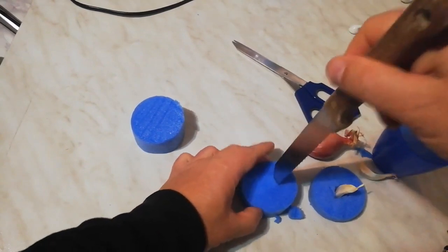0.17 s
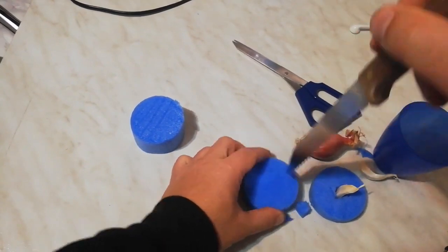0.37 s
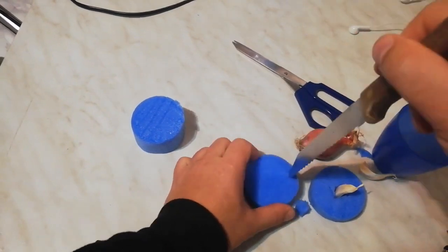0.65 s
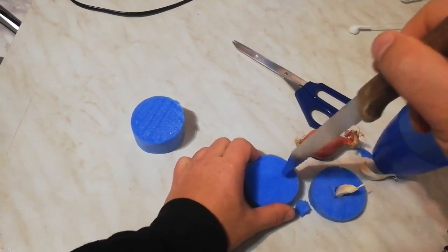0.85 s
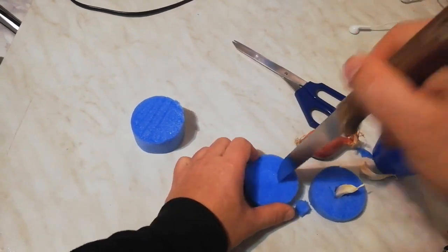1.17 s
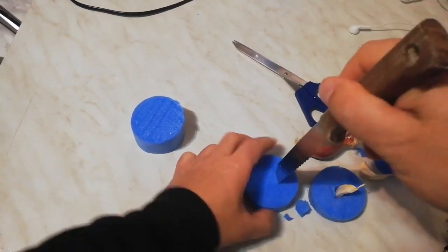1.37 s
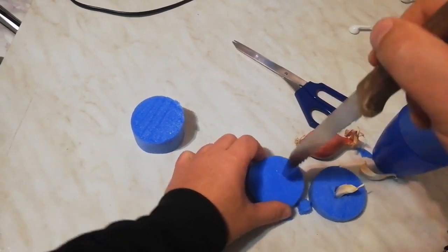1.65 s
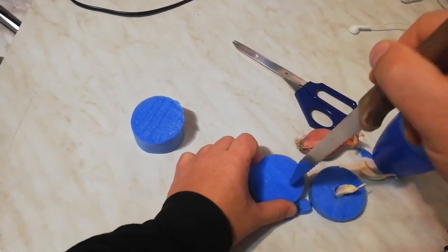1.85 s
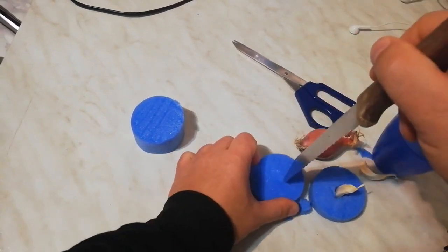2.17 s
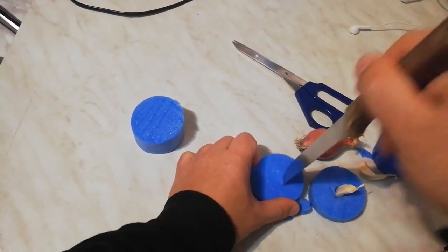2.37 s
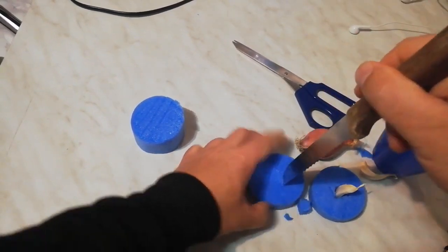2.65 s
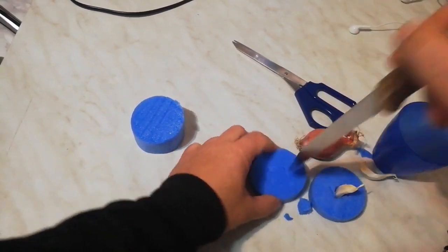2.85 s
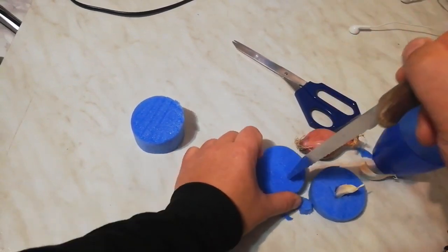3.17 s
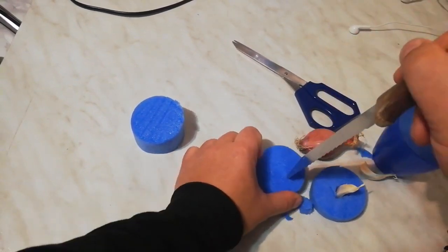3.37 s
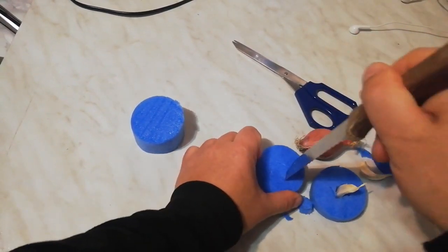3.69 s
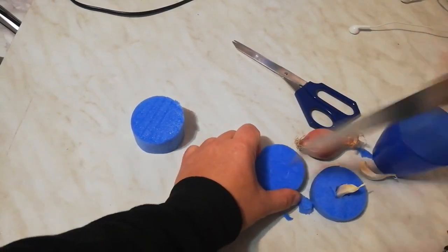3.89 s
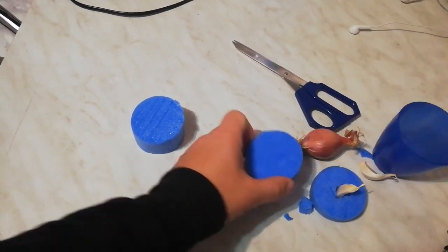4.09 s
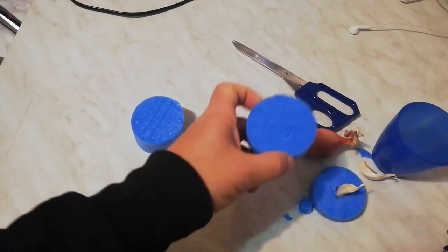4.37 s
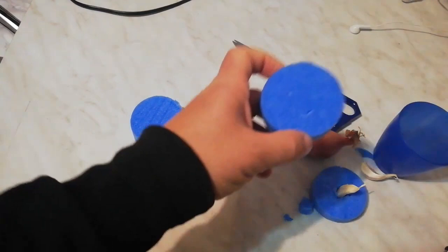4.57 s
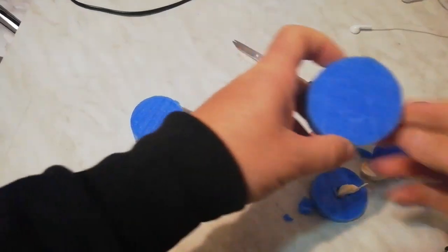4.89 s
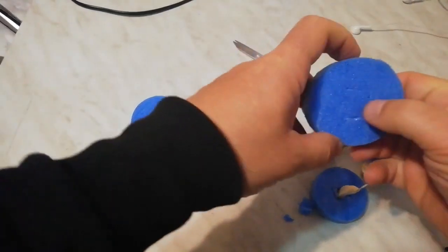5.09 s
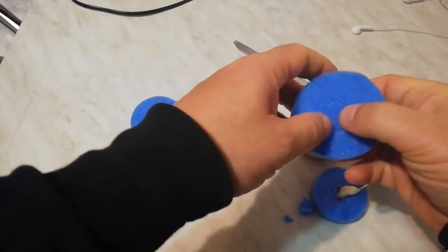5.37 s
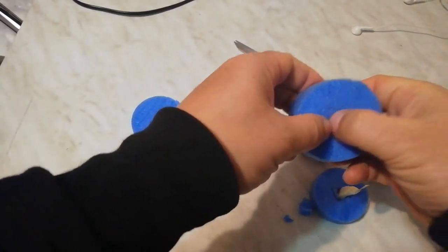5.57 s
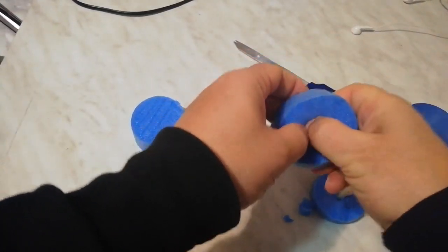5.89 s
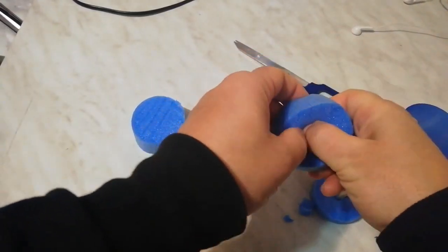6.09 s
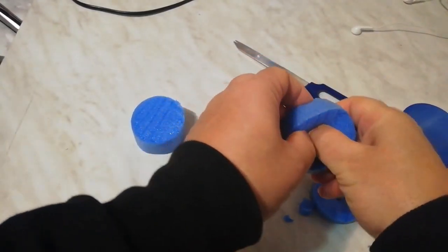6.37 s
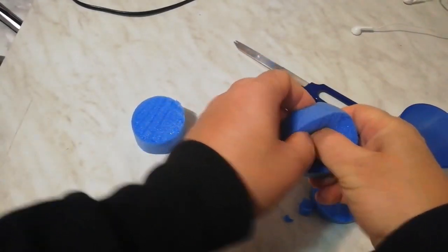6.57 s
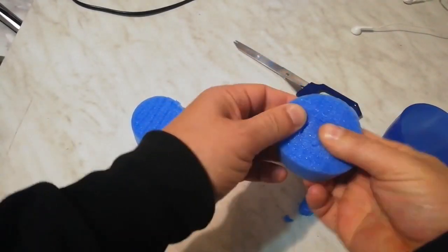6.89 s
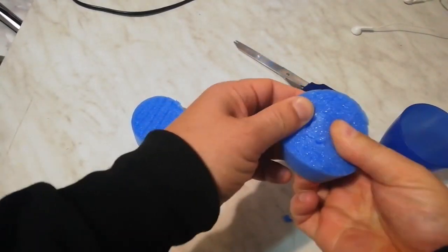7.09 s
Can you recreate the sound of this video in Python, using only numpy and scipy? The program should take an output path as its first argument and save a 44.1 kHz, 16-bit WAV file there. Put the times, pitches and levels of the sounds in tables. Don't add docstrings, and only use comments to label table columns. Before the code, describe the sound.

Close stereo sound in a small hard room, with very faint, mostly low background noise. At 0 s a table knock is dying away, followed by soft dry scraping and slight squeaks of a blade in stiff foam. From 1.1 s a short crackling crunch ends in a loud, hard wooden knock at 1.24. Light rubbing continues; a thin high steel skim at 2.2 leads to a second crunch and strong knock at 2.45, then sharp snaps at 2.6 and 2.85. A third, finer crackle at 3.53 ends in a duller, weaker knock at 3.63. Scraping fades. From 4.37 to 4.95 the dropped knife clatters at right, steel and handle rattling amid soft thuds. At 4.8 fingers grab the foam with a loud rustle, squeezing and popping until 5.5. Near-silent faint fizz follows, then quick rubs and snaps at 6.7-7.0, and quiet.

```python
import sys
import numpy as np
from scipy import signal
from scipy.fft import rfft, irfft
from scipy.io import wavfile
from scipy.ndimage import uniform_filter1d

SR = 44100
rng = np.random.default_rng(int(sys.argv[2]) if len(sys.argv) > 2 else 0)


def wrap_up_sound(samples):
    columns = np.atleast_2d(samples).T
    tamed = np.clip(columns, -1, 1)
    steps = np.round(tamed * 32767).astype(np.int16)
    wavfile.write(sys.argv[1], SR, steps)


def amplitude_ratio(level_db):
    exponent = np.asarray(level_db, float) / 20
    return 10 ** exponent


N = 319284
LEAD = 4096
TRACK = N + LEAD


def read(table, hz):
    points = np.array(table)
    return np.interp(np.log(hz + 1), np.log(points[:, 0]), points[:, 1])


def hiss(size, colour, likeness, source=None):
    hz = np.arange(size // 2 + 1) * SR / size
    mid, side = rfft(rng.standard_normal((2, size)) if source is None else source)
    alike = np.clip(read(likeness, hz), -.99, .99)
    pair = np.sqrt(1 + alike) * mid + np.sqrt(1 - alike) * side * np.array([[1], [-1]])
    out = irfft(pair * amplitude_ratio(read(colour, hz)), size)
    return out / np.sqrt(np.mean(out ** 2))


def tail(colour, t60, likeness, size=32768):
    t = np.arange(size) / SR
    spectrum = rfft(hiss(size, colour, likeness))
    octave = np.log2(np.arange(size // 2 + 1) * SR / size + 1)
    out = 0
    for centre in np.arange(5, 14.6, .5):
        share = np.clip(1 - 2 * abs(octave - centre), 0, 1)
        decay = read(t60, 2 ** centre)
        fade = 1000 ** (-t / max(decay, .005))
        out = out + irfft(spectrum * share, size) * fade / np.sqrt(decay)
    return out / np.sqrt(np.sum(out ** 2) / 2)


def ring(modes, size=4608):
    t = np.arange(size) / SR
    hz, db, t60 = np.transpose(modes)[:, :, None]
    place = rng.standard_normal((len(modes), 1))
    turn = rng.standard_normal((len(modes), 2)).T[..., None]
    phase = 0.75 * np.minimum(hz / 600, 1) * turn
    waves = amplitude_ratio(db + 1.2 * place) * np.sin(2 * np.pi * hz * (1 + 0.0073 * place) * t + phase)
    fade = 1000 ** (-t / np.maximum(t60, .005))
    out = np.sum(waves * fade, axis=1) * np.minimum(t / 0.00016, 1)
    return out / abs(out).max()


def add(track, s, sound):
    at = LEAD + int(s * SR)
    track[..., at:at + sound.shape[-1]] += sound[..., :track.shape[-1] - at]


def swell(rows):
    t = (np.arange(0, TRACK, 64) - LEAD) / SR
    rows = np.array(rows)
    s, db, rise, fall = rows.T[:4, :, None]
    away = np.where(t < s, (s - t) / np.maximum(rise, .003), (t - s) / np.maximum(fall, .003))
    power = amplitude_ratio(2 * np.maximum(db - 30 * away, -130))
    total = power.sum(0)
    slow = [10 * np.log10(total)]
    slow += [(power * column[:, None]).sum(0) / total for column in rows.T[4:]]
    return [np.interp((np.arange(TRACK) - LEAD) / SR, t, curve) for curve in slow]


# start in seconds, end in seconds.
PUSHES = [
    (1.1, 1.238),
    (2.322, 2.449),
    (3.532, 3.633),
]


def cell_crackle():
    t = (np.arange(0, TRACK, 24) - LEAD) / SR
    boring = sum((t > start) & (t < end) for start, end in PUSHES)
    burst = np.minimum(rng.exponential(size=len(t)), 5) - 1.0
    cells = amplitude_ratio((1.5 + 0.74 * boring) * burst - 3.6 * boring).repeat(24)[:TRACK]
    slips = rng.standard_normal((4, TRACK // 400 + 1)).repeat(400, axis=1)[:, :TRACK]
    slips = uniform_filter1d(slips, size=400)
    return [rng.standard_normal((2, TRACK)) * cells * amplitude_ratio(2.2 * slip) for slip in slips]


BORE_DB = [-27.5, -28.5, -30.5]
# peak in seconds, level in dB, rise in seconds, fall in seconds, squeak in dB.
DRAGS = [(0.048, -43, 0.046, 0.074, 1.5), (0.263, -44, 0.12, 0.15, -11.5),
         (0.361, -40.5, 0.074, 0.28, -9.5), (0.489, -49, 0.35, 0.35, -1.5),
         (0.819, -52, 0.029, 0.021, -3.5), (1.368, -42, 0.17, 0.078, -5), (1.457, -48, 0.081, 0.066, -1),
         (1.56, -50, 0.11, 0.73, 4), (1.63, -42, 0.33, 0.29, -11.5), (2.1, -64.5, 0.077, 0.042, -0.5),
         (2.22, -68.5, 0.049, 0.059, -24.5), (2.403, -33, 0.02, 0.16, -12.5), (2.575, -39.5, 0.013, 0.1, 0),
         (2.719, -44.5, 0.24, 0.078, 1.5), (2.858, -45, 0.32, 0.62, -4.5), (3.048, -54, 0.99, 0.067, -17.5),
         (3.8, -49.5, 0.47, 0.34, 5), (3.89, -39, 0.093, 0.13, -6), (4.049, -52, 1, 0.35, 2),
         (4.338, -49, 0.21, 0.043, -3)]
SQUEEZES = [
    (4.801, -27, 0.018, 0.2, 0),
    (4.966, -33, 0.063, 0.084, -11),
    (5.072, -44.5, 0.074, 0.1, -7),
    (5.284, -38, 0.19, 0.092, -4.5),
    (5.42, -37.5, 0.052, 0.087, -7.5),
    (6.675, -49, 0.049, 0.61, -10.5),
    (6.715, -37, 0.011, 0.11, -6),
    (6.801, -48, 0.19, 0.33, -12.5),
    (6.97, -49, 0.22, 0.31, -6.5),
]
# pitch in Hz, level in dB per Hz.
FIZZ = [(3530, -21.5), (6000, -9.5), (8420, -8), (9930, -1.5), (10600, -5.5), (15300, -24.5), (16200, -32),
        (16500, -60.5)]
# pitch in Hz, likeness from -1 to 1.
NEAR = [(60, .99), (130, .96), (290, .65), (480, -.4), (700, -.4), (1410, .4), (3100, .3), (6820, -.05),
        (15000, .1)]


def rubbing(crackle):
    bores = [(end, db, 0.77 * (end - start), .035, -2.5) for (start, end), db in zip(PUSHES, BORE_DB)]
    bites = [(start, -55.5, 0, 0.35, 0) for start, end in PUSHES]
    blade_pan_db, hands_pan_db = 1, -1.5
    strokes = [(*row, blade_pan_db) for row in DRAGS + bores + bites]
    strokes += [(*row, hands_pan_db) for row in SQUEEZES]
    fizz_db, squeak_db, pan_db = swell(strokes)
    rasp_db = (1 - 0.93) * np.minimum(-45 - fizz_db, 35) - 5.5
    squeak_colour = [(600, -12.5), (1100, -8.5), (1500, 0), (2100, -4.0), (2800, -6), (4000, -31.5)]
    rasp_colour = [(2000, -24.5), (2900, 2.5), (4000, 2.0), (5200, 0.5), (6500, -12.5), (8000, -28.5)]
    squeak = hiss(TRACK, squeak_colour, NEAR, crackle[0])
    rasp = hiss(TRACK, rasp_colour, NEAR, crackle[1])
    fizz = hiss(TRACK, FIZZ, NEAR, crackle[2])
    mix = fizz + amplitude_ratio(squeak_db - 4.0) * squeak + amplitude_ratio(rasp_db) * rasp
    return mix * amplitude_ratio(fizz_db + 1.0 + np.array([pan_db, -pan_db]) / 2)


# start in seconds, level in dB, centre pitch in Hz, left minus right in dB, bright click in dB.
TICKS = [(.0363, -30.5, 1630, 7, 1), (.2448, -34, 3400, -8.5, -11), (.815, -43.5, 1890, 2, -11),
         (1.5489, -27.5, 3570, 8, 7), (2.0926, -41, 2140, -3, 6), (2.1859, -44, 3570, -10, -5.5),
         (2.5765, -21.5, 1930, -4, 1.5), (2.8439, -18, 3010, -3, -2.5), (3.243, -41.5, 3760, 5, -6),
         (3.269, -44, 9500, 5, 3), (3.3653, -31.5, 2180, 8, -18), (3.5017, -51, 9800, 3.5, 3),
         (3.8741, -25, 2000, 10, -0.5), (4.1684, -43, 1750, -8, 2.5), (5.1731, -28, 3990, 5, 0),
         (5.2754, -24, 1630, 0, 5), (6.5066, -54, 4170, 3.5, -7), (6.7151, -24.5, 2560, -9, 3.5),
         (6.755, -21.5, 2320, 1, 4.5), (6.8493, -34.5, 2100, 14, 2), (6.9835, -32.5, 1970, 3, 2),
         (7.009, -31.5, 5460, 4, 1.5), (7.2085, -42.5, 3920, 3, 2.5)]
# start in seconds, level in dB, centre pitch in Hz.
BURSTS = [(1.1032, -38.5, 5560), (1.1383, -37.5, 5520), (1.1548, -34.5, 5400), (1.176, -22.5, 5000),
          (1.1864, -40, 5320), (1.2037, -37, 2800), (1.118, -39, 5300), (2.325, -37, 4760),
          (2.3287, -41.5, 2160), (2.333, -40.5, 4700), (2.406, -20.5, 5170), (2.438, -35, 2190),
          (3.4716, -43.5, 2920), (3.5354, -28, 5860), (3.5434, -43, 1850), (3.5593, -28, 5950),
          (3.5666, -30, 5200), (3.5736, -26, 5600), (3.592, -29, 4690), (3.603, -29.5, 4690),
          (3.609, -22, 6440), (3.6214, -31, 5000)]


def ticks():
    out, t = np.zeros((2, TRACK)), np.arange(1024) / SR
    burst_pan_db, snap_t60 = 4, 0.014
    rows = TICKS + [(*row, burst_pan_db, 0) for row in BURSTS]
    for s, db, hz, pan_db, bright_db in rows:
        noise = rng.standard_normal((3, 1024))
        burst = (noise[0] + 0.75 * noise[1:]) * 1000 ** (-t / snap_t60)
        bright = signal.lfilter(*signal.butter(2, [8300, 12000], "band", fs=SR), burst)
        pitched = signal.lfilter(*signal.butter(2, [hz / 1.345, hz * 1.36], "band", fs=SR), burst)
        share = min(amplitude_ratio(bright_db - 3.5), .95)
        snap = share * bright / abs(bright).max()
        snap = snap + np.sqrt(1 - share ** 2) * pitched / abs(pitched).max()
        add(out, s, snap * amplitude_ratio(db + np.array([[pan_db], [-pan_db]]) / 2))
    return out


# start in seconds, level in dB, hardness in dB.
KNOCKS = [(-.03, -11, 14), (.812, -42.5, 3), (1.2385, -4, 14), (1.249, -11.5, -1), (1.338, -20, 11),
          (1.457, -37, 12), (1.56, -42.5, 11), (1.858, -51.5, 11.5), (1.9, -66, -9.5), (2.186, -46, -5),
          (2.246, -40.5, -11), (2.261, -33.5, -17.5), (2.418, -34, 15.5), (2.4503, -2.5, 9),
          (2.461, -12, 8), (2.553, -24, 11), (3.3655, -42.5, 8.5), (3.634, -7.5, -2.5), (3.742, -42, 14),
          (4.387, -34, -16.5), (4.549, -11.5, -12.5), (4.5605, -8.5, -10), (4.575, -17.5, -16),
          (4.645, -31, -5), (4.775, -18.5, 14), (4.885, -26.5, -8.5), (4.945, -28, -10.5),
          (5.045, -38, -16), (5.5, -45.5, -23), (5.555, -56.5, -24), (5.61, -51.5, -24.5),
          (6.825, -46, -24), (6.9, -47, -16), (6.925, -37, -17.5)]
# pitch in Hz, level in dB, time to die by 60 dB in seconds.
TABLE = [(88, -24.5, .15), (130.6, -6, 0.42), (212.6, -9.5, 0.18), (260, -16.5, 0.0222), (322, 0.5, 0.11),
         (411.8, 5, 0.074), (479, -5, 0.13), (529.8, -3.5, 0.14), (562.6, -9, 0.13), (809.3, -6, 0.17),
         (936, 3.5, .055), (1212, -6.5, 0.083), (1405, -6, 0.043), (905, -9, 0.09), (1890, -11, 0.055),
         (2343, -5, 0.025)]
# pitch in Hz, level in dB per Hz.
BOARD = [(40, -56.5), (90, -16.5), (200, -7.5), (450, 6), (680, -1), (950, -5), (1600, -3), (1900, -17),
         (4000, -22.5), (9000, -35.5)]
# pitch in Hz, time to die by 60 dB in seconds.
BOARD_T60 = [(60, 0.082), (300, 0.028), (1000, 0.037), (2000, 0.066), (9000, 0.011)]


def table_knocks():
    out = np.zeros((2, TRACK))
    spots = [tail(BOARD, BOARD_T60, NEAR, size=12288) for _ in range(4)]
    for k, (s, db, hard_db) in enumerate(KNOCKS):
        push = np.hanning(int(np.clip(14 / amplitude_ratio(hard_db), 3, 400)) + 2)[None]
        struck = amplitude_ratio(9.5) * spots[k % 4] - ring(TABLE, size=12288)
        struck_again = amplitude_ratio(11) * spots[(k + 1) % 4] + ring(TABLE[10:], size=12288)
        first = signal.fftconvolve(push, struck, axes=1)
        second = signal.fftconvolve(push, struck_again, axes=1)
        add(out, s, amplitude_ratio(db) * first / abs(first).max())
        bounce_db = db - 1 + 0.86 * min(hard_db, 0)
        add(out, s + .0055, amplitude_ratio(bounce_db) * second / abs(second).max())
    return out


# start in seconds, level in dB, blade ring in dB, rattle time to die by 60 dB in seconds, handle in dB.
DROP = [(4.373, -11, 9.5, 0.046, -39), (4.3785, -16, 17, 0.056, -10), (4.4061, -10.5, 4, 0.034, -24),
        (4.4298, -19, 4.5, 0.027, -31), (4.4337, -17, -2.5, 0.05, -18), (4.445, -25.5, -8, 0.075, -25),
        (4.453, -20, 8, 0.06, -22), (4.4596, -29, -5, 0.14, 1), (4.5, -42.5, -6, 0.064, 8.5),
        (4.5462, -11.5, -19, 0.059, -6.5), (4.55, -8.5, -35, 0.17, -10), (4.644, -10.5, -8, 0.054, 0),
        (4.658, -17.5, -12, 0.18, -14), (4.6908, -11.5, -8, 0.039, -6.5), (4.698, -12.5, -7, 0.022, -11),
        (4.71, -30, -7, 1, 1.5), (4.756, -28, -6, .04, -26), (4.7709, -5.5, -17, 0.027, -30),
        (4.775, -7, -26, 0.015, -9), (4.7807, -4, -6, 0.052, -22), (4.786, -17, -20, 0.14, -11),
        (4.937, -31, -10, 0.056, -2), (4.948, -29, -1, .15, -13)]
# pitch in Hz, level in dB, time to die by 60 dB in seconds.
BLADE = [(3430, 1, 0.027), (4400, -7, 0.023), (6320, 1, 0.027), (6520, 12.5, 0.0057), (7460, 15.5, 0.015),
         (7950, -28, .04), (8200, 4, 0.019), (9100, -4, 0.08), (10100, 3, 0.042), (10960, -14, 0.044),
         (11200, -17, .03), (13040, -12, 0.042)]
HANDLE = [(1416, -4, 0.06), (1630, 1, 0.11), (2020, -4, 0.02), (3230, -14, .05)]
# pitch in Hz, level in dB per Hz.
RATTLE = [(590, -15.5), (1000, -15), (1460, -21), (2270, -11), (4760, -8.5), (5880, -11), (9400, -2.5),
          (12900, -6), (15200, -25.5), (16500, -30)]
SKID = [(500, -5.5), (1000, -4.5), (1500, 3.5), (2400, -2.5), (4300, -4), (5500, -31)]


def dropped_knife():
    out, rattle, skid = np.zeros((3, 2, TRACK))
    t = np.arange(8192) / SR
    for s, db, ring_db, t60, handle_db in DROP:
        blade = amplitude_ratio(db + ring_db - 5.5) * ring(BLADE, size=2560)
        handle = amplitude_ratio(db + handle_db - 7.5) * ring(HANDLE, size=2560)
        add(out, s, blade + handle)
        fade = 1000 ** (-t / max(t60, .003))
        add(rattle, s, amplitude_ratio(db) * fade)
        add(skid, s, amplitude_ratio(db + handle_db) * fade ** 0.71)
    alike = [(1000, 0.25), (9000, 0.05)]
    out = out + amplitude_ratio(-11.0) * rattle * hiss(TRACK, RATTLE, alike)
    out = out + amplitude_ratio(-5.0) * skid * hiss(TRACK, SKID, alike)
    left_lag = 20
    return amplitude_ratio([[-1.2], [1.2]]) * np.array([np.roll(out[0], left_lag), out[1]])


# peak in seconds, level in dB, rise in seconds, fall in seconds.
SLIDES = [(.45, -66, 0.028, 8.1), (1.232, -38, 0.12, 0.023), (2.27, -53.5, 0.23, 0.092),
          (2.44, -41.5, 0.11, 0.022), (3.625, -39.5, 0.18, 0.024), (3.9, -43, 0.037, 0.44),
          (4.82, -26.5, 0.023, 0.25), (5.052, -57, 0.17, 0.048), (5.55, -58, 0.37, 0.18),
          (6.72, -72, 0.075, 0.056), (6.94, -62.5, .28, 0.022)]


def shuffling(crackle):
    colour = [(60, -27.0), (130, -1.5), (320, 0.0), (550, -3.0), (900, -14.0), (1500, -32)]
    return amplitude_ratio(swell(SLIDES)[0] - 4.5) * hiss(TRACK, colour, NEAR, crackle[3])


# peak in seconds, level in dB, rise in seconds, fall in seconds.
EDGE = [
    (2.205, -62, .02, 0.22),
    (2.222, -54.5, .06, 0.094),
    (2.28, -66.5, .1, .04),
]


def edge_skim(crackle):
    colour = [(8200, -37), (8800, -7.5), (9400, 2.5), (9900, -29)]
    return amplitude_ratio(swell(EDGE)[0]) * hiss(TRACK, colour, NEAR, crackle[3])


# peak in seconds, level in dB, rise in seconds, fall in seconds.
CREEP = [
    (5.546, -56, 0.078, 2.15),
]


def resting_thumbs(crackle):
    t = (np.arange(TRACK) - LEAD) / SR
    level_db = swell(CREEP)[0] - 200 * np.maximum(t - 6.55, 0)
    return amplitude_ratio(level_db) * hiss(TRACK, FIZZ, NEAR, crackle[2])


# pitch in Hz, time to die by 60 dB in seconds.
ROOM_T60 = [(60, 0.3), (200, 0.89), (600, 0.58), (1500, 0.82), (4000, 0.35), (10000, 0.23)]
# pitch in Hz, level in dB.
ROOM = [(60, -5.5), (130, -4.5), (350, -9), (600, -2), (1500, -8.5), (4000, -8.5), (10000, -20),
        (16000, -5.5)]
# pitch in Hz, likeness from -1 to 1.
LIKENESS = [(60, 1), (130, 0.53), (290, .8), (640, -0.66), (1410, 0.37), (3100, 0.15)]


def room_echo(near):
    walls = np.pad(tail(ROOM, ROOM_T60, LIKENESS), ((0, 0), (260, 0)))
    return amplitude_ratio(-6.5) * signal.fftconvolve(near[:1], walls, axes=1)[:, :TRACK]


# pitch in Hz, level in dB per Hz.
FLOOR = [(12, -32.5), (20, -4.5), (53, -4), (86, -8), (135, -8.5), (174, -15.5), (583, -19), (1050, -18.5),
         (1180, -16), (1280, -22), (1840, -18), (5070, -27), (10500, -24.5), (15200, -36.5), (16500, -47)]


def background():
    return amplitude_ratio(-63.5) * hiss(N, FLOOR, LIKENESS)


def scene():
    crackle = cell_crackle()
    near = rubbing(crackle) + ticks() + table_knocks() + dropped_knife()
    near = near + shuffling(crackle) + edge_skim(crackle) + resting_thumbs(crackle)
    return (near + room_echo(near))[:, LEAD:] + background()


def roll_off(x):
    return signal.sosfilt(signal.butter(12, 16970, fs=SR, output="sos"), x)


def record(dry):
    side = (dry[0] - dry[1]) / 2
    high_side = signal.lfilter(*signal.butter(1, 259.3, "high", fs=SR), side)
    dry = dry + np.outer([1, -1], high_side - side)
    no_bass = signal.lfilter(*signal.butter(2, 62, "high", fs=SR), dry)
    soft = np.tanh(0.9 * no_bass) / 0.88
    steep = signal.ellip(6, .3, 32, 15700, fs=SR, output="sos")
    return roll_off(signal.sosfilt(steep, soft))


dry = scene()
out = record(dry)
wrap_up_sound(out)
```